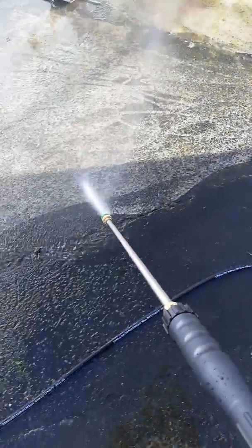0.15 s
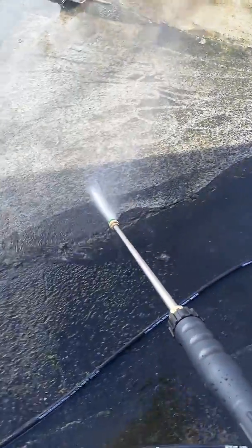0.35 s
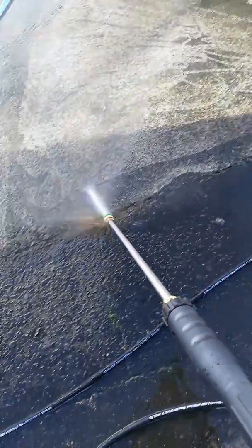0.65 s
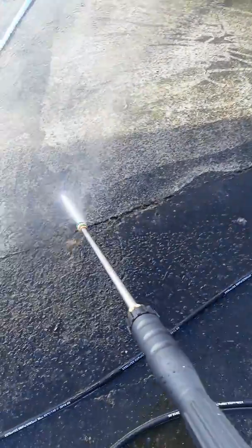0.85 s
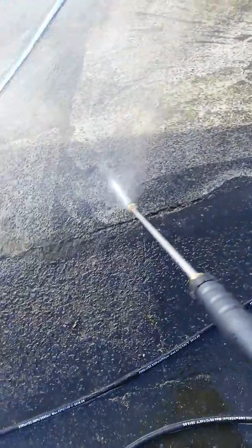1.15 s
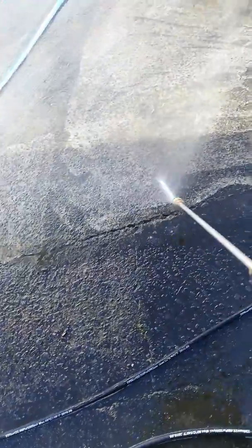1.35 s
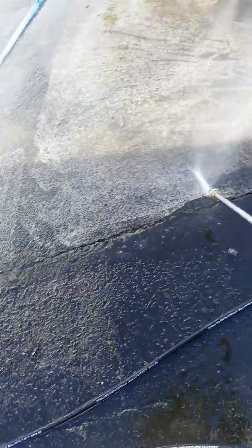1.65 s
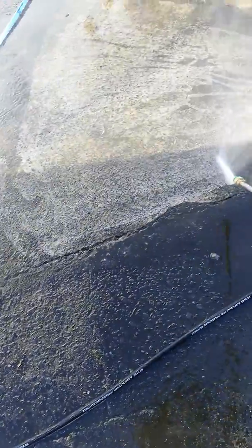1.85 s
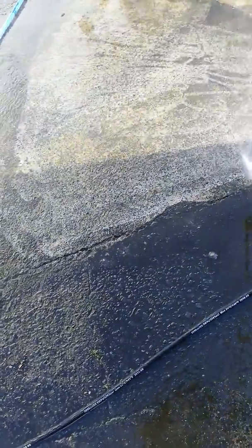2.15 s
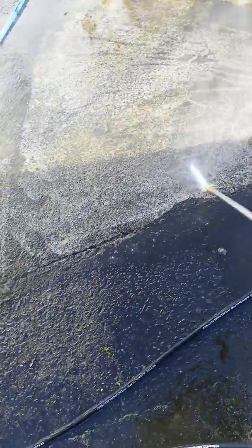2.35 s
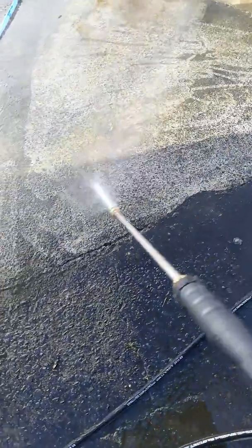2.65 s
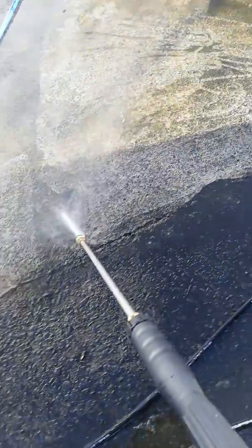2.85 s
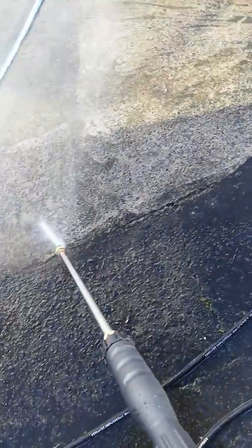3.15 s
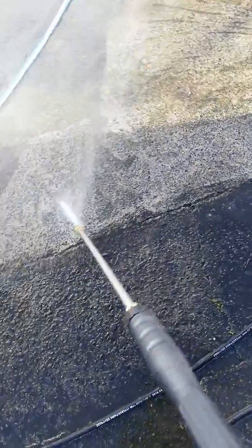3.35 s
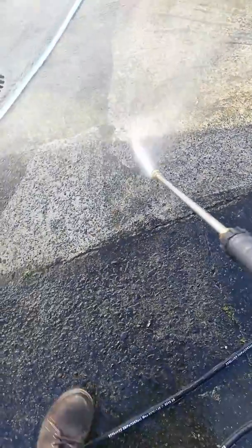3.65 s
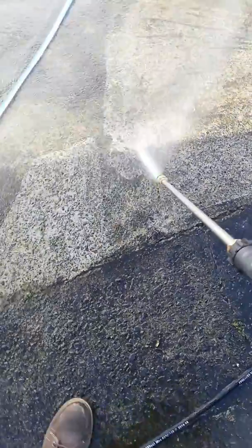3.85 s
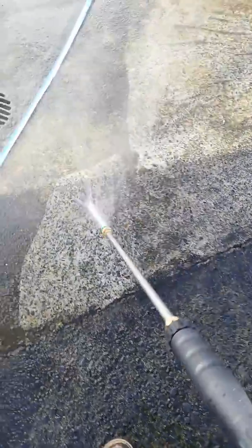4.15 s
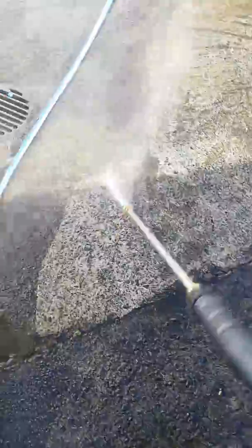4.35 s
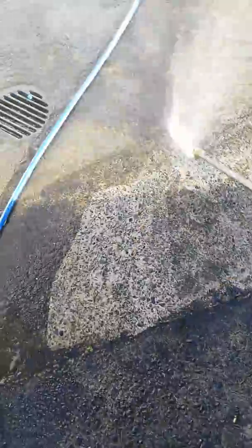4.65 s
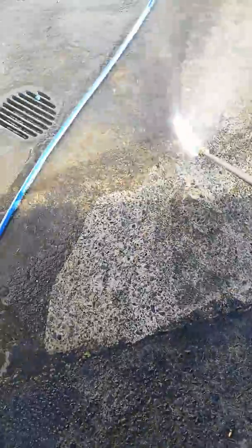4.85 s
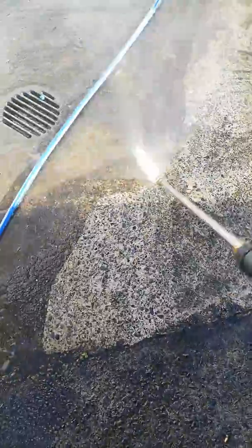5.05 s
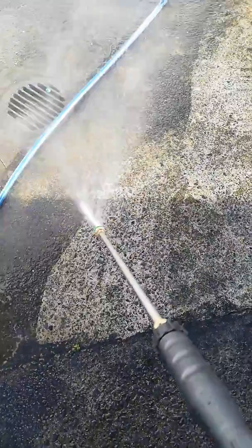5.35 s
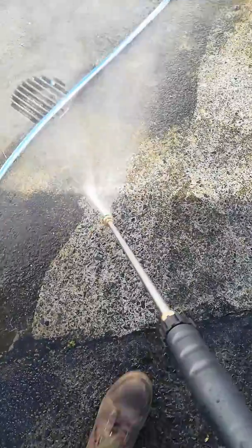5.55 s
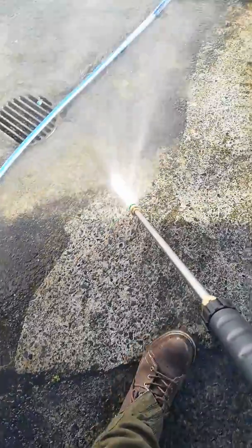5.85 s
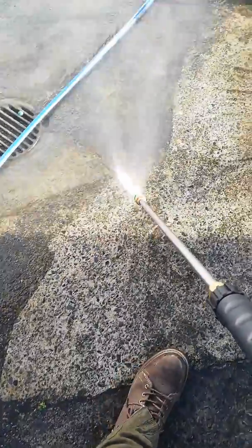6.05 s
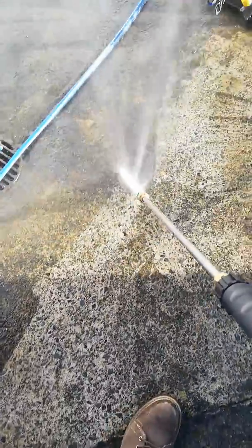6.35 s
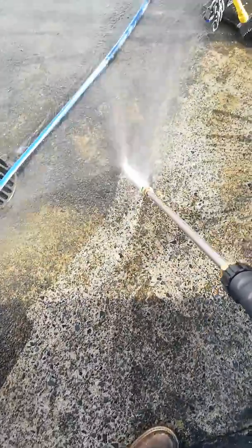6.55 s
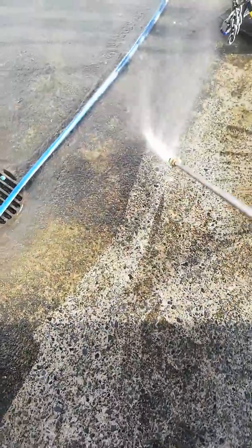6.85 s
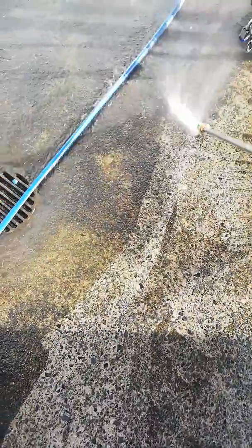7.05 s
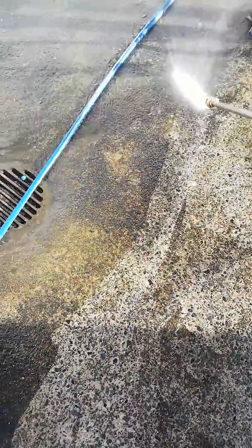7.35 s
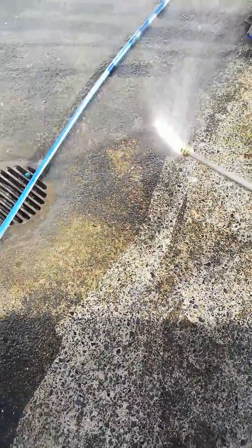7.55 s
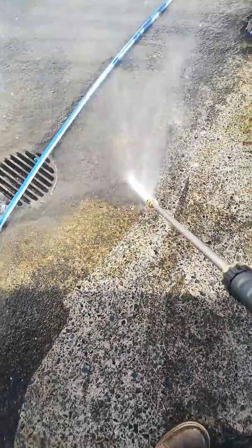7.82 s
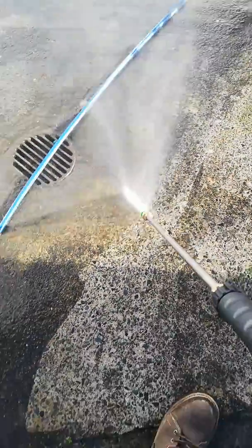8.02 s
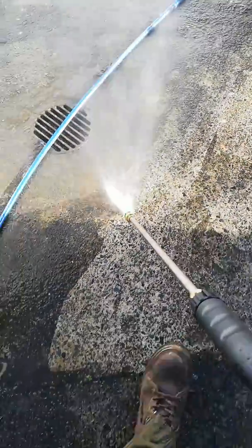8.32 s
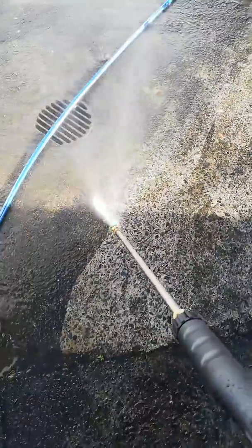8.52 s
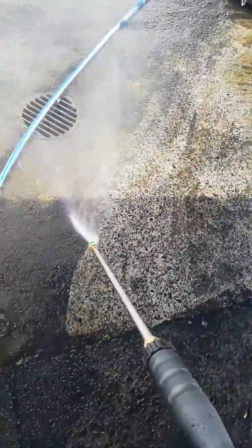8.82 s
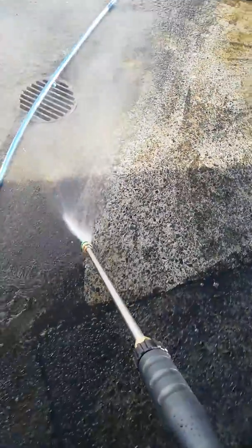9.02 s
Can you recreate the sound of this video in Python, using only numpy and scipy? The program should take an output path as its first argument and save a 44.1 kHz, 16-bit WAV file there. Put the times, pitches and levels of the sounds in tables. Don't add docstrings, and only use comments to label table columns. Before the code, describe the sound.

From 0 s the sound is already at full force: a wide, bright, rushing hiss of pressurised water striking wet concrete, close to a handheld stereo microphone outdoors. Beneath it a single-cylinder petrol engine drives the pump at steady speed, a fast low buzzing thump near 31 pulses a second, with hard metallic ringing in the mids and a fan and intake roar. The spray flutters very slightly with the pump. Around 0.7 s the hiss briefly swells; from 1 to 2.6 s it leans and shifts in tone as the lance swings out and back. Between 3 and 5 s quicker sweeps move its balance, and the engine opens up, less muffled as the holder turns. Near 6.7 s the hiss strengthens, then eases and alters around 7.4 s at a wide swing, rising again by 8 s. Low engine notes waver with echoes. Everything continues unbroken to about 9.2 s.

```python
import sys
import numpy as np
from scipy import signal
from scipy.io import wavfile
from scipy.ndimage import uniform_filter1d

SR = 44100
rng = np.random.default_rng(int(sys.argv[2]) if len(sys.argv) > 2 else 0)


def voltage_ratio(level):
    return 10 ** (np.asarray(level, float) / 20)


def generate_wav(signal):
    frames = np.transpose(np.atleast_2d(signal))
    scaled = np.clip(frames, -1, 1) * 32767
    pcm = np.round(scaled).astype(np.int16)
    wavfile.write(sys.argv[1], SR, pcm)


N = 404838
HOP = 256
HZ = np.fft.rfftfreq(1024, 1 / SR)

# (time [s], rate [firing cycles/s])
ENGINE_SPEED = [(0.0, 30.8), (0.76, 30.616), (1.53, 30.609), (2.3, 30.715), (3.06, 30.606), (3.82, 30.763),
                (4.59, 30.661), (5.36, 30.69), (6.12, 30.615), (6.88, 30.633), (7.65, 30.601),
                (8.42, 30.615), (9.18, 30.685)]
# (frequency [Hz], likeness [0-1], lead of the left port [rad])
PORT_COHERENCE = [(60, 1, 0), (300, .8, .5), (520, .4, 1.0), (720, .35, 2.2), (950, .65, .2),
                  (1900, .55, .1), (2500, .45, 2.7), (3300, .26, 3.6), (4500, .42, 4.2), (6000, .38, 6.9),
                  (7500, .2, 9.0), (9000, .29, 11.4), (11000, .23, 16.1), (15000, .05, 26.7)]


def evened(x):
    return x / np.sqrt(np.mean(x ** 2) + 1e-20)


def over_hz(table):
    f, *columns = np.transpose(table)
    return np.array([np.interp(np.log(HZ + 1), np.log(f), c) for c in columns])


def over_time(table, t):
    s, *columns = np.transpose(table)
    return np.array([np.interp(t, s, c - c.mean()) for c in columns])


def spread(anchors_hz, rows_db):
    anchors = np.arange(len(anchors_hz))
    place = np.interp(np.log(HZ + 1), np.log(anchors_hz), anchors)
    weights = np.maximum(1 - abs(place[:, None] - anchors), 0)
    return weights @ rows_db


def random_curve(points):
    return np.interp(np.arange(N), np.linspace(0, N, points), rng.standard_normal(points))


def spectra(x):
    return signal.stft(x, nperseg=1024, noverlap=1024 - HOP)[2]


def sound(z):
    return signal.istft(z, nperseg=1024, noverlap=1024 - HOP)[1][:, :N]


def turbulence(t, lead_s, patchy_db, flicker_db):
    a, b, c, d, patches = rng.standard_normal((len(t), len(HZ), 5)).T
    patches = uniform_filter1d(patches, size=14, axis=0)
    patches = evened(uniform_filter1d(patches, size=12, axis=1))
    flicker = evened(uniform_filter1d(rng.standard_normal(len(t)), size=4))
    same, phase = over_hz(PORT_COHERENCE)[:, :, None]
    same = np.clip(same, 0, 1)
    left, unrelated = a + 1j * b, c + 1j * d
    late = np.exp(-1j * (phase + 2 * np.pi * HZ[:, None] * lead_s))
    right = same * left * late + np.sqrt(1 - same ** 2) * unrelated
    return np.array([left, right]) * voltage_ratio(patchy_db * patches + flicker_db * flicker)


def bump(octave, centre_hz, width_octaves):
    return np.exp(-.5 * ((octave - np.log2(centre_hz)) / width_octaves) ** 2)


def path(t, at_hz):
    # (time [s], body shadow [0-1], first dip of ground echo [Hz], strength of echo [dB])
    stance = [(0.04, 0.54, 152.0, -1), (0.49, 0.6, 240, -3.9), (1.16, 0.66, 241.0, -10),
              (1.59, 0.97, 230, -9), (2.08, 0.83, 374, 5.7), (2.63, 0.65, 231.0, -16),
              (3.23, 0.35, 256, -4), (3.72, 0.28, 184.0, -5), (4.27, 0.32, 190, -14.3),
              (5.03, 0.12, 186, -8), (5.62, 0.19, 224, -5), (6.48, 0.12, 232, -7), (7.28, 0.1, 236, -5.5),
              (7.71, 0.07, 227, -1), (8.3, 0.19, 212.0, -6.0), (8.82, 0.08, 182, -4.5),
              (9.18, 0.18, 176, -6)]
    # (frequency [Hz], level [dB])
    shade = [(60.0, -3), (123.0, -1), (170.0, 3.5), (387.0, -12.5), (705.0, -4.1), (799.0, -9),
             (1393.0, -4.5), (2218.0, -1)]
    # (start [s], length [s], centre [Hz], level
    # [dB])
    walls = [(-0.27, 0.75, 292.0, 14), (0.48, 0.6, 341.0, -7.1), (1.48, 1.09, 291, 13),
             (2.57, 0.51, 489.0, 6), (2.807, 1.56, 1895, 5.5), (2.87, 1.4, 1553.0, -5),
             (3.14, 0.34, 1100, 5), (3.64, 1.1, 516, 4), (5.06, 1.06, 960, 4.5), (5.735, 1.95, 330, -6),
             (5.97, 2.3, 1480, 5), (6.414, 1.37, 670, 8), (6.46, 1.34, 775, -12), (6.673, 0.97, 120.0, 14),
             (8.41, 1.1, 770, 3.5), (8.65, 1.1, 324.0, 10.5),
             (-.3, 0.67, 243, 6),
        (1.0, 1.4, 1050, 3),
        (1.6, 1.2, 790, -4),
        (2.753, 1.1, 155, 3.5),
        (3.5, 1.2, 985, 1),
        (3.9, 0.38, 350, -9),
        (6.9, 0.85, 2010, 3),
    ]
    dip_octaves, wall_octaves, edge_s = 0.11, 0.064, 0.098
    s, *columns = np.transpose(stance)
    shadow, dip_hz, echo_db = [np.interp(t, s, c) for c in columns]
    octave = np.log2(at_hz[:, None] + 1)
    f, shade_db = np.transpose(shade)
    field = np.interp(octave, np.log2(f), shade_db) * shadow
    field = field + echo_db * bump(octave, dip_hz, dip_octaves)
    field = field + 0.29 * echo_db * bump(octave, 1.47 * dip_hz, dip_octaves)
    for start, length, hz, db in walls:
        enter = np.tanh((t - start) / edge_s)
        leave = np.tanh((t - start - length) / edge_s)
        field = field + db * (enter - leave) / 2 * bump(octave, hz, wall_octaves)
    return field - 10 * np.log10(np.mean(voltage_ratio(field) ** 2, axis=1, keepdims=True))


def crank():
    s, rate = np.transpose(ENGINE_SPEED)
    flutter = evened(uniform_filter1d(rng.standard_normal(N), size=3000))
    cycles_per_s = np.interp(np.arange(N) / SR, s, rate) * (1 + .001 * flutter)
    return .71 + np.cumsum(cycles_per_s) / SR


def roar(t):
    # (frequency [Hz], left level [dB], right level [dB])
    roar_spectrum = [(45, -14.0, -14.4), (110, -15.7, -15.5), (230, -13.3, -12.7), (400, -15.4, -14.5),
                     (550, -8.8, -11.6), (750, -5.3, -12.1), (950, -4.0, -6.7), (1150, -4.0, -5.9),
                     (1350, -6.3, -6.8), (1600, -4.4, -3.1), (1950, -3.2, 3.5), (2250, -3.0, 2.7),
                     (2450, -2.9, -0.2), (2750, -0.6, -1.1)]
    roar_db = over_hz(roar_spectrum) - 36.0 - 30 * np.log2(np.maximum(HZ / 2300, 1))
    roar_db[:, HZ < 100] -= 12
    return turbulence(t, 0, patchy_db=1.2, flicker_db=.6) * voltage_ratio(roar_db)[:, :, None]


def casing(turns, uneven_db=1.2, slack_s=2e-5):
    # (frequency [Hz], width [Hz], left level [dB], right level [dB], crank
    struck_modes = [(674, 30, -41, -53, .9), (735, 22, -40.5, -44.5, .53), (797, 22, -34, -48, .78),
                    (870, 40, -40, -44, .96), (920, 22, -41, -44, .13), (981, 22, -36, -36, .8),
                    (1012, 22, -41, -47, .33), (1103, 25, -39, -42, .95), (1165, 22, -37, -36, .11),
                    (1257, 40, -41, -41, .74), (1410, 50, -48, -46, .05), (1471, 22, -43, -41, .66),
                    (1520, 50, -48, -46, .5), (1625, 30, -44, -40, .06),
                    (1720, 70, -43, -43, .54), (1779, 22, -41, -34, .65), (1810, 22, -41, -35, .54),
                  (1870, 25, -40, -31, .78), (1931, 25, -39, -35, .08), (1990, 50, -47, -39, .78),
                  (2054, 25, -46, -38, .5), (2160, 45, -44, -37, .8), (2238, 30, -44, -37, .5),
                  (2370, 60, -46, -46, .75), (2575, 30, -45, -47, .68), (2700, 90, -46, -51, .69),
                  (2800, 60, -45, -48, .68), (2880, 30, -46, -50, .7)]
    out = np.zeros((2, N))
    for hz, width_hz, left_db, right_db, angle in struck_modes:
        at = np.flatnonzero(np.diff(np.floor(turns - angle)))
        strength, late = rng.standard_normal((300, 2))[:len(at)].T
        fade_db = 0.75 + 1.3 * np.interp(at, np.linspace(0, N, 10), rng.standard_normal(10))
        struck = np.clip(at + np.round(late * slack_s * SR).astype(int), 0, N - 1)
        blows = np.zeros(N)
        blows[struck] = voltage_ratio(uneven_db * strength + fade_db)
        b, a = signal.iirpeak(hz, hz / width_hz, SR)
        ring = signal.lfilter(b, a, blows * N / len(at) / np.sqrt(2))
        out += ring * voltage_ratio(np.array([[left_db], [right_db]]))
    return out


def exhaust(turns):
    # (multiple of the cycle [1], level [dB])
    harmonics = [(1, -10), (2, 0), (3, -10.5), (4, -30), (5, -10.5), (6, -11), (7, -22.5), (8, -10.5),
                 (9, -20.5), (10, -24), (11, -15.5), (12, -21.5), (13, -18.5), (14, -16.5), (15, -26),
                 (16, -16), (17, -20), (18, -17), (19, -14.5), (20, -14.5)]
    pops, push_lag = (.56, .92), .36
    level_db, firing_db = -27, 0.47
    t = np.arange(0, N + HOP, HOP) / SR
    multiples_hz = np.transpose(harmonics)[0] * np.transpose(ENGINE_SPEED)[1].mean()
    out = np.zeros(N)
    for (k, db), path_db in zip(harmonics, path(t, multiples_hz)):
        db = db + np.interp(np.arange(N) / SR, t, path_db)
        waver_db = .07 * k * random_curve(40)
        timing = np.angle(sum(np.exp(-2j * np.pi * k * pop) for pop in pops))
        if k in (1, 3, 5):
            timing -= 2 * np.pi * push_lag / np.sqrt(k)
        drift = .09 * (k - 2) * random_curve(12)
        out += voltage_ratio(db + waver_db) * np.cos(2 * np.pi * k * turns + timing + drift)
    firings = evened(uniform_filter1d(rng.standard_normal(300), size=3))
    uneven = np.interp(turns, np.arange(300), firings)
    return voltage_ratio(level_db + firing_db * uneven) * np.sqrt(2) * out


def engine(turns):
    thump, ring = spectra(exhaust(turns)), spectra(casing(turns))
    t = np.arange(ring.shape[2]) * HOP / SR
    ports = np.exp(-1j * np.outer([0, 1], over_hz(PORT_COHERENCE)[1]))[:, :, None]
    return sound(thump * ports + (ring * ports + roar(t)) * voltage_ratio(path(t, HZ)))


def jet(turns):
    # (frequency [Hz], left level [dB], right level [dB])
    spray_spectrum = [(2400, -9.5, -3.5), (2760, -1.5, -1.5), (3040, -5, -8.5), (4000, -5.5, -4.45),
                      (5160, -6.5, -5), (6070, -5.5, -5.5), (6400, -4.5, -9.5), (7320, -2.6, -11.5),
                      (8840, -0.06, -6.5), (10360, -5, -1.2), (11100, -8, -5), (12500, -10, -10.5),
                      (13700, -13, -10.5), (16600, -22, -17)]
    # (time [s], hiss level [dB], lance tipped flat [dB])
    blast = [(0.0, -21.5, 2.5), (0.54, -20, -0.5), (0.66, -17, -1), (0.79, -20.5, 1.2), (1.43, -20, 3.7),
             (2.63, -20.5, 2.5), (2.96, -19.5, 1.2), (3.27, -20.5, 2), (4.81, -21.5, 2.1),
             (6.75, -19.5, 1.4), (7.39, -22.5, 2.8), (8.0, -19.5, 0.01), (8.31, -21.5, -0.3),
             (9.0, -20.5, -2), (9.08, -23, 1), (9.18, -21.5, -1)]
    # (time [s], extra lead of the left port [us])
    lance_sweep = [(0, -16), (1.0, -15), (1.3, -2), (2.0, 4), (2.6, 0), (3.1, -40), (3.75, 22), (4.2, -28),
                   (4.75, 46), (5.4, -24), (5.7, -8), (6.3, 7), (6.75, 19), (7.35, 83), (7.8, 4),
                   (8.3, -16), (8.8, -47), (9.18, -36)]
    # (time [s], shift upward [octaves])
    nozzle_height = [(0, -0.032), (1.0, -0.027), (1.5, -0.0037), (2.1, 0.057), (2.6, -0.0046),
                     (3.2, -0.012), (3.7, 0.0011), (4.2, -0.0014), (4.8, 0.032), (5.4, -0.0061),
                     (6.4, 0.0057), (7.0, 0.053), (7.35, -0.01), (7.9, 0.022), (8.6, -0.0078),
                     (9.18, 0.0076)]
    t = np.arange(N // HOP + 3) * HOP / SR
    hiss_db, flat_db = over_time(blast, t)
    lead_us = over_time(lance_sweep, t)[0]
    swing = np.tanh(lead_us / 47)
    shake = uniform_filter1d(rng.standard_normal((len(t), 2)), size=20, axis=0)
    wobble_db = 0.14 * evened(shake).T

    body_db = (0.13 - 1) * hiss_db + 1.5 * swing - .4 * flat_db + wobble_db[0]
    fizz_db = flat_db - 4.1 * swing
    pan_db = -2.5 * swing + 2 * wobble_db[1]
    shape_db = []
    for side, share in ((0.21, 0.52), (-0.72, 1.4)):
        rows_db = [body_db, side * pan_db, share * fizz_db, .4 * fizz_db]
        shape_db.append(spread([4340, 8800, 13500, 15500], rows_db))

    jet_db = over_hz(spray_spectrum) - 34 - 30 * np.log2(np.maximum(2500 / (HZ + 1), 1))
    s, octaves = np.transpose(nozzle_height)
    bins = np.arange(len(HZ))
    slid = bins[:, None] * 2 ** -np.interp(t, s, octaves)
    jet_db = np.array([np.interp(slid, bins, side_db) for side_db in jet_db])
    z = turbulence(t, 1e-6 * lead_us, patchy_db=.8, flicker_db=.45)
    throb_db = 1.3 * np.exp(2.5 * (np.cos(2 * np.pi * (turns - .77)) - 1))
    return sound(z * voltage_ratio(jet_db + hiss_db + shape_db)) * voltage_ratio(throb_db)


def scene():
    turns = crank()
    return engine(turns) + jet(turns)


def low_pass(x):
    return signal.sosfilt(signal.butter(12, 15760, fs=SR, output="sos"), x)


def record(dry):
    mix = np.clip(dry, -.9, .9)
    return low_pass(mix)


dry = scene()
out = record(dry)
generate_wav(out)
```